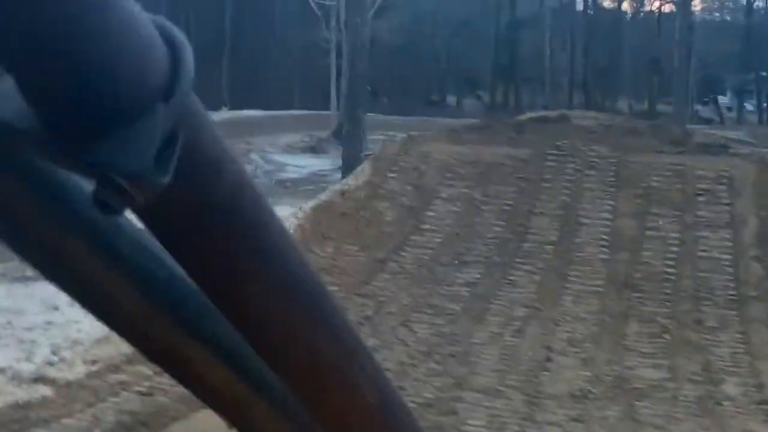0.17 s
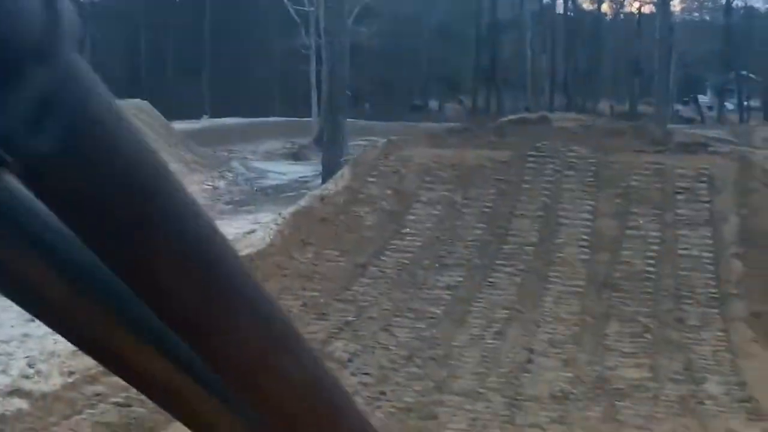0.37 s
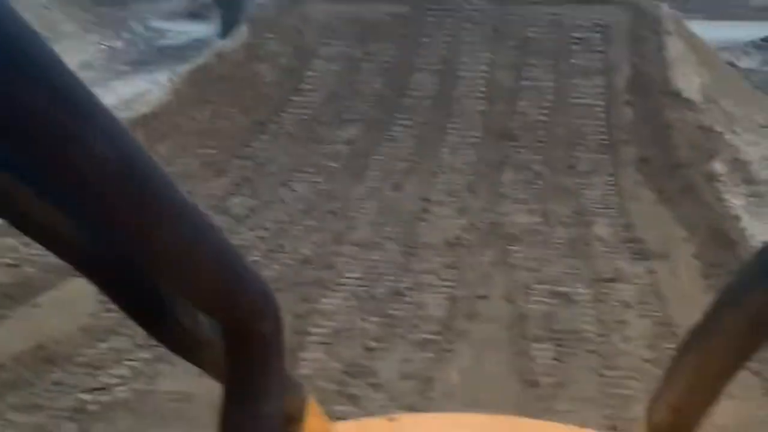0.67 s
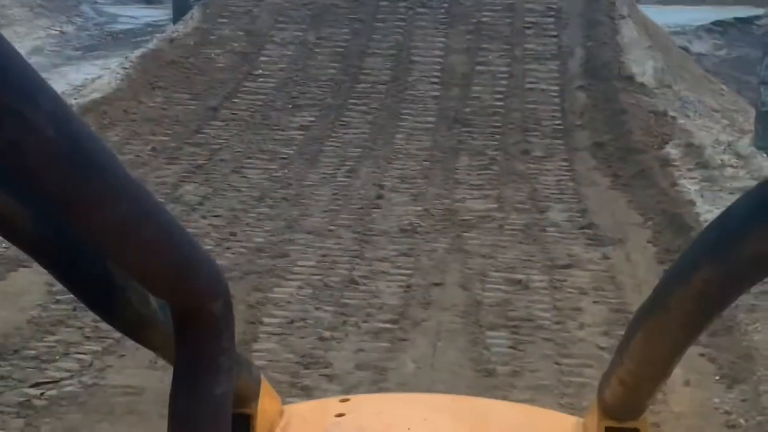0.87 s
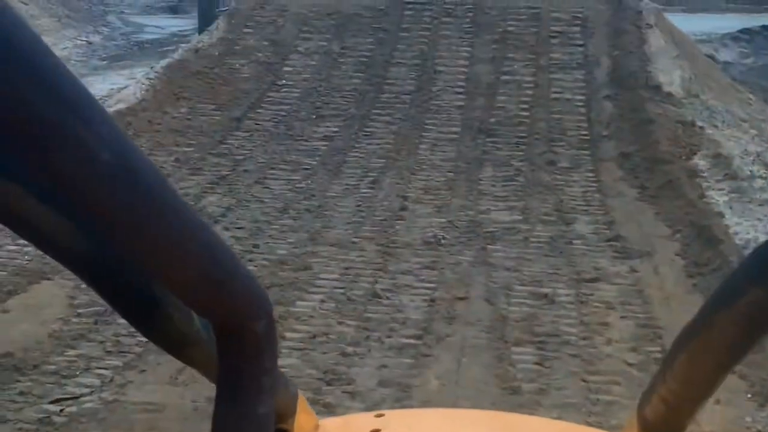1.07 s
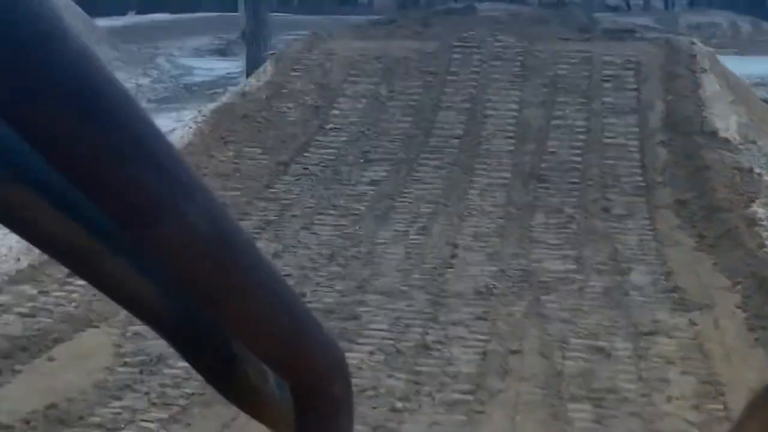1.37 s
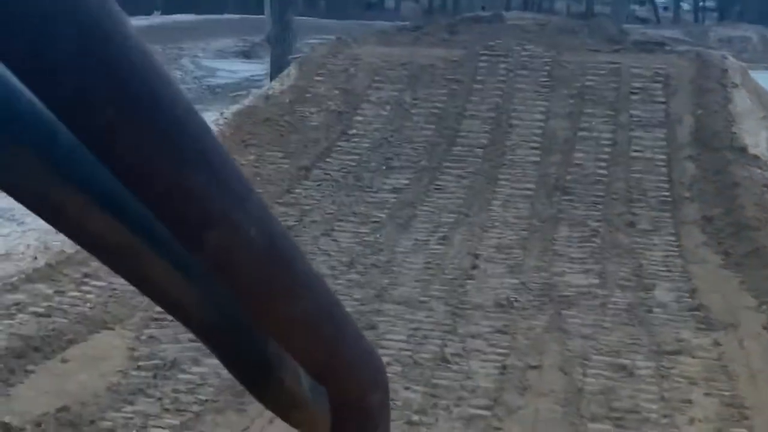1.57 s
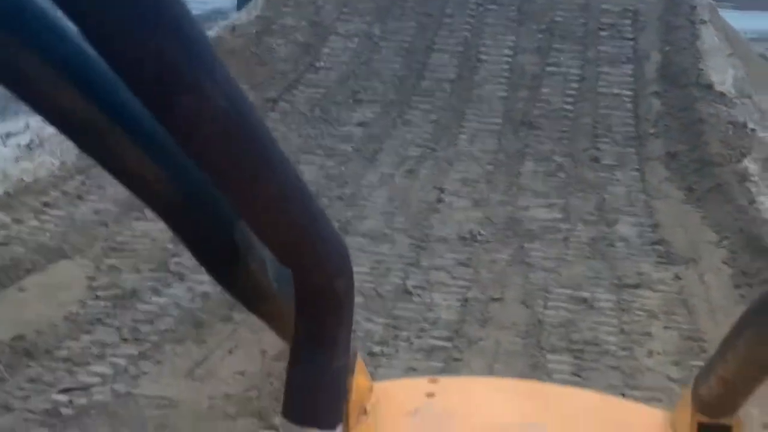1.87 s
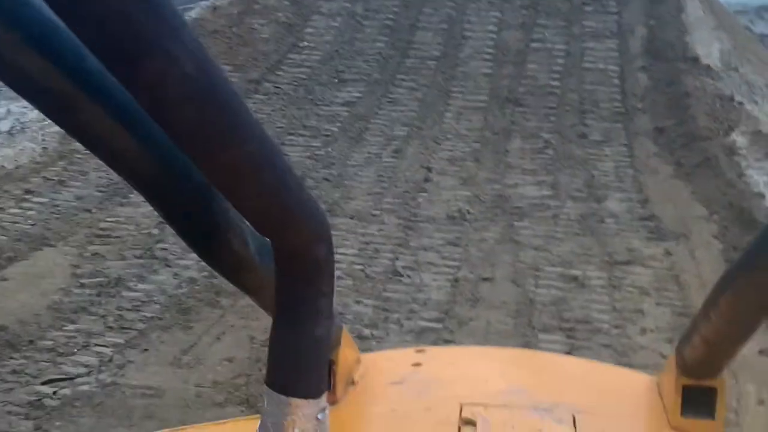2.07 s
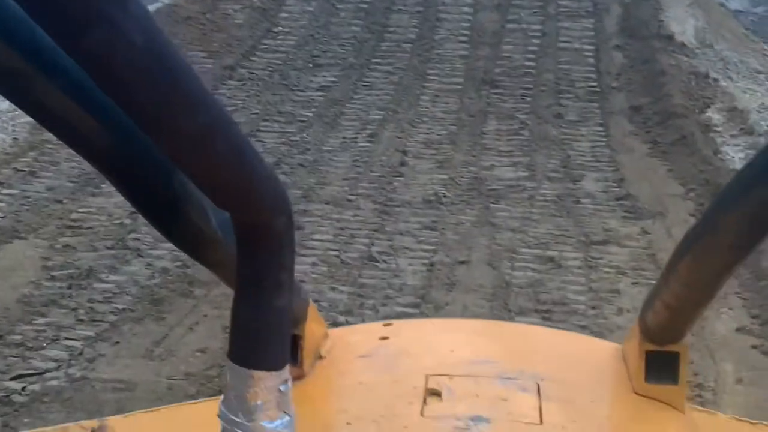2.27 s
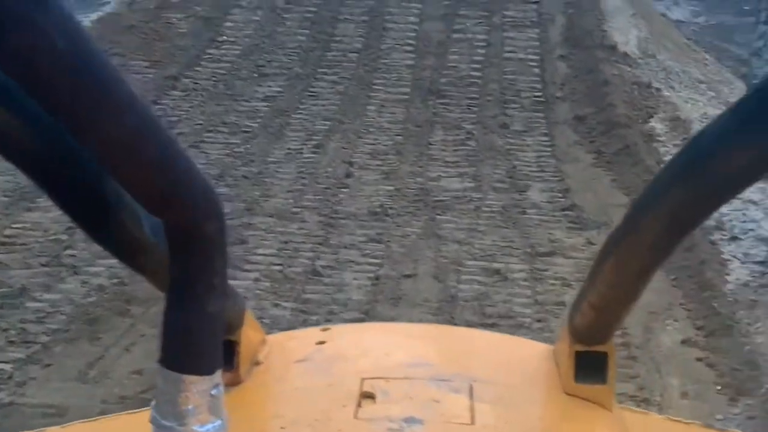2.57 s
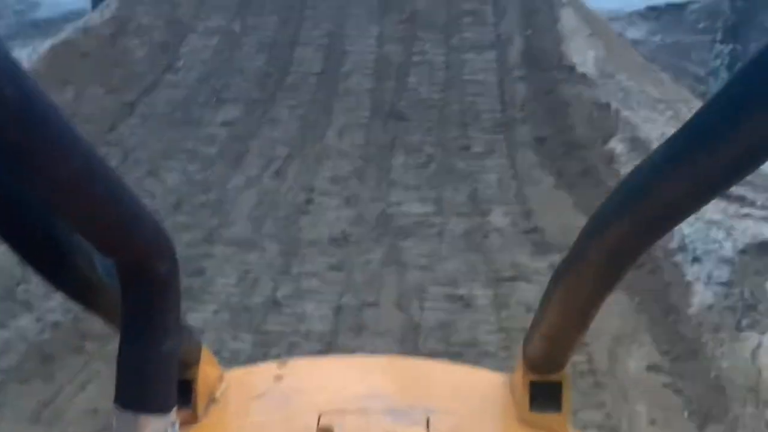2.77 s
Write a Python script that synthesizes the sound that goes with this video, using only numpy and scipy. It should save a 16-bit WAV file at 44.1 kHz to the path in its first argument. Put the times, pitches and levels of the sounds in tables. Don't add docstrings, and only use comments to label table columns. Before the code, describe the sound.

A diesel crawler tractor runs at constant speed outdoors, heard close from the open seat: low humming roar, rapid engine knock, shuddering sheet metal, and irregular track clanks with short metallic rings throughout.

```python
import sys
import numpy as np
from scipy import signal
from scipy.fft import rfft, irfft
from scipy.io import wavfile
from scipy.ndimage import uniform_filter1d

SR = 44100
rng = np.random.default_rng(int(sys.argv[2]) if len(sys.argv) > 2 else 0)


def gain_from_decibels(decibels):
    exponent = np.asarray(decibels, float) / 20
    return 10 ** exponent


def wav_out(sig):
    wavfile.write(sys.argv[1], SR, np.round(np.clip(np.atleast_2d(sig).T, -1, 1) * 32767).astype(np.int16))


N = 128772

PULSE_LEAD_RAD = 0.56
# frequency in Hz, level in dB.
STEEL_COLOUR = [(500, -10), (1500, 9), (3000, 1.5), (6000, 0), (10000, -6), (15000, -10)]


def read(points, hz):
    f, value = np.transpose(points)
    return np.interp(np.log(hz + 1), np.log(f + 1), value)


def evened(x):
    return x / np.sqrt(np.mean(x ** 2) + 1e-20)


def colour(x, points):
    hz = np.fft.rfftfreq(N, 1 / SR)
    return irfft(rfft(x) * gain_from_decibels(read(points, hz)), N)


def slow(top_hz, count):
    t = np.arange(0, N + 128, 128) / SR
    f = np.geomspace(0.3, top_hz, 16)[:, None]
    rows = []
    for _ in range(count):
        sines = np.sin(2 * np.pi * (f * t + rng.random((16, 1))))
        curve = evened((sines / f ** 0.18).sum(0))
        rows.append(np.interp(np.arange(N) / SR, t, curve))
    return np.array(rows)


def patchy(size, bins, frames, depth_db):
    a, b, c, d, patches = rng.standard_normal((4 * N // size + 5, size // 2 + 1, 5)).T
    patches = uniform_filter1d(patches, bins, axis=0)
    patches = evened(uniform_filter1d(patches, frames, axis=1))
    z = np.array([a + 1j * b, c + 1j * d]) * gain_from_decibels(depth_db * patches)
    noise = signal.istft(z, nperseg=size, noverlap=size - size // 4)[1]
    return evened(noise[:, :N])


def cycles():
    # time in seconds, crank cycles in Hz.
    speed = [(0, 12.46), (.3, 12.5), (.5, 12.41), (.65, 12.34), (.9, 12.385), (1.15, 12.36), (1.55, 12.405),
             (1.95, 12.44), (2.2, 12.385), (2.45, 12.425), (2.92, 12.45)]
    return np.cumsum(np.interp(np.arange(N) / SR, *np.transpose(speed))) / SR


def exhaust():
    orders = [4, 5.5, 7, 8, 12, 13.33, 16, 17, 26, 29, 32, 51, 56, 72, 80, 84]
    # level in dB, wobble in dB.
    strengths = [(-30.5, .15), (-50, 3), (-44, 2.5), (-23.5, .3), (-41, 3), (-38, 1.5), (-42, 3), (-45, 3),
                 (-48, 3), (-48, 3), (-46, 2), (-48, 2), (-46, 2), (-50, 2), (-50, 2), (-54, 2)]
    wobble_hz, drift_rad = 5, 0.29
    db, wobble_db = np.transpose(strengths)[:, :, None]
    sway = slow(wobble_hz, count=len(orders))
    drift = slow(wobble_hz, count=len(orders))
    order = np.array(orders)[:, None]
    lead = PULSE_LEAD_RAD * (order / orders[0]) ** 2
    phase = 2 * np.pi * order * cycles() + lead + drift_rad * wobble_db / 2 * drift
    waves = gain_from_decibels(db + wobble_db * sway) * np.cos(phase)
    return np.sqrt(2) * waves.sum(0)


def roar():
    # frequency in Hz, density in dB per Hz.
    roar_colour = [(25, -35), (60, 2), (170, 3.5), (420, -2.5), (1000, -5.5), (2200, -13.5), (4500, -23.5),
                   (9000, -35)]
    # frequency in Hz, width in Hz, level in dB.
    sheets = [(393.3, 15, -46.5), (586, 220, -42), (958, 12, -51), (1351, 12, -53.5), (1720, 54, -58),
              (200.4, 59, -48.5)]
    roar_db, top_db_per_khz = -30.5, -0.24
    hz = np.fft.rfftfreq(N, 1 / SR)
    spectrum = rfft(patchy(size=1024, bins=6, frames=8, depth_db=1.5))
    shape_db = read(roar_colour, hz) + top_db_per_khz * np.maximum(hz - 9000, 0) / 1000
    body = evened(irfft(spectrum * gain_from_decibels(shape_db), N))
    resonances = 0
    for f, width_hz, db in sheets:
        resonance = 1 / (1 + (2 * (hz - f) / width_hz) ** 2)
        resonances = resonances + gain_from_decibels(db) * evened(irfft(spectrum * resonance, N))
    throb = gain_from_decibels(1.5 * np.cos(2 * np.pi * (cycles() - 0.15)))
    return gain_from_decibels(roar_db) * body + throb * resonances


def rap():
    ring_hz, width_s, slip_s = 760, 0.0011, 0.0005
    rap_db, spread_db, weak_db = -29.5, 2.5, -6
    usual_cycle_hz = 12.41
    firing = 4 * cycles() + PULSE_LEAD_RAD / (2 * np.pi) + 0.5
    k = firing.astype(int)
    size, slip = rng.standard_normal((k[-1] + 1, 2))[k].T
    t = (firing % 1 - 0.5) / (4 * usual_cycle_hz) - slip_s * slip
    db = rap_db + spread_db * size + weak_db * (k % 4 == 1)
    return gain_from_decibels(db) * np.exp(-0.5 * (t / width_s) ** 2) * np.cos(2 * np.pi * ring_hz * t)


def knock():
    # frequency in Hz, level in dB.
    knock_colour = [(300, -22), (800, 1), (2000, 5.5), (4500, -32), (9000, -10), (15000, -18)]
    cylinder_db = np.array([1.5, -1.5, -4.5, 0.085])
    knock_db, decay_firings = -44.5, 0.93
    firing = 4 * cycles()
    k = firing.astype(int)
    chance_db = 2.3 * rng.standard_normal(k[-1] + 1)[k]
    puff = gain_from_decibels(cylinder_db[k % 4] + chance_db) * np.exp(-(firing % 1) / decay_firings)
    noise = colour(rng.standard_normal((2, N)), knock_colour)
    return gain_from_decibels(knock_db) * evened(evened(puff) * noise)


def shudder(table, spread_s, trim_db):
    reach = SR // 16
    t, out = np.arange(-reach, reach) / SR, np.zeros(N + SR)
    for (s, hz, db), start in zip(table, rng.random(len(table))):
        at = round(s * SR)
        swell = gain_from_decibels(db + trim_db) * np.exp(-0.5 * (t / spread_s) ** 2)
        out[at:at + len(t)] += swell * np.sin(2 * np.pi * (hz * t + start))
    return out[reach + 1:][:N]


def thump():
    # time in seconds, frequency in Hz, level in dB.
    hood = [(0.012, 382, -30), (0.058, 355, -31), (0.186, 398, -27), (0.255, 387, -27), (0.302, 398, -28),
            (0.334, 387, -31), (0.403, 392, -28), (0.746, 382, -26), (0.833, 409, -31), (0.981, 387, -28),
            (1.057, 387, -25), (1.138, 387, -25), (1.248, 387, -26), (1.312, 387, -27), (1.425, 382, -29),
            (1.463, 387, -25), (1.518, 403, -31), (1.576, 387, -29), (1.625, 387, -29), (1.701, 414, -29),
            (1.805, 387, -27), (1.86, 392, -29), (1.945, 387, -27), (2.026, 387, -31), (2.087, 366, -29),
            (2.122, 387, -30), (2.186, 392, -29), (2.276, 387, -31), (2.456, 366, -31), (2.514, 392, -28),
            (2.589, 398, -30), (2.647, 355, -30), (2.694, 387, -28), (2.731, 382, -27), (2.842, 382, -31),
            (2.911, 382, -29)]
    # time in seconds, frequency in Hz, level in dB.
    cab = [(0.02, 753, -34), (0.134, 656, -31), (0.134, 990, -34), (0.145, 457, -30), (0.194, 538, -31),
           (0.223, 990, -34), (0.267, 694, -33), (0.308, 1243, -34), (0.412, 565, -31), (0.441, 1216, -38),
           (0.444, 592, -31), (0.47, 764, -34), (0.499, 231, -27), (0.551, 710, -32), (0.61, 495, -32),
           (0.633, 613, -32), (0.711, 683, -32), (0.746, 1308, -38), (0.868, 220, -28), (0.955, 559, -31),
           (1.019, 317, -30), (1.062, 705, -32), (1.062, 958, -35), (1.08, 1426, -39), (1.097, 484, -31),
           (1.109, 274, -31), (1.12, 764, -34), (1.132, 888, -34), (1.295, 193, -27), (1.37, 317, -32),
           (1.384, 753, -34), (1.416, 1324, -38), (1.445, 1001, -34), (1.448, 1195, -38),
           (1.527, 1410, -38), (1.55, 220, -28), (1.768, 215, -27), (1.771, 1415, -39), (1.852, 699, -30),
           (1.852, 1410, -38), (1.858, 780, -34), (1.878, 489, -32), (2.093, 193, -27), (2.273, 220, -27),
           (2.328, 317, -30), (2.485, 301, -29), (2.485, 1157, -37), (2.511, 581, -31), (2.569, 1372, -38),
           (2.586, 576, -31), (2.595, 188, -27), (2.606, 1211, -38), (2.778, 942, -33), (2.818, 952, -35),
           (2.833, 581, -32), (2.905, 958, -33)]
    return shudder(hood, spread_s=0.013, trim_db=0) + shudder(cab, spread_s=0.014, trim_db=-1)


def clanks():
    # (lowers the dull part,
    # raises the bright; they part near 4 kHz).
    landings = [(0.0558, -34.5, -1), (0.0997, -40.5, 4), (0.1496, -37, -6.5), (0.2004, -44.5, 4),
                (0.2224, -52, 4), (0.295, -39, -3), (0.3854, -47.5, 5.5), (0.5374, -30, -4),
                (0.628, -49, -2), (0.726, -44, 4.5), (0.7886, -48, -6), (0.9513, -40, -4), (1.0056, -49, 6),
                (1.038, -47, 7), (1.072, -33, -2.5), (1.113, -52, -5), (1.1907, -41, 2),
                (1.2607, -33.5, -2), (1.4106, -36, -4), (1.515, -37, -2), (1.5419, -37, -2.5),
                (1.5948, -48, 1), (1.6666, -38, 0.5), (1.7574, -47, 3), (1.8334, -41, -4), (1.8974, -39, 1),
                (1.9939, -54, 6), (2.0742, -49, 1), (2.1585, -44, 1), (2.2288, -34.5, 0.5),
                (2.423, -35, -3), (2.4814, -40, 1.5), (2.56, -41, 2), (2.7033, -45, 1), (2.745, -36, -5),
                (2.804, -56, 0), (2.8794, -30, -2.5)]
    # frequency in Hz, level in dB, 60 dB decay time in seconds.
    link_modes = [(2550, 0, .1), (3700, -2, .1), (4490, -1, .1), (4850, -1, .1), (5560, -1, .1),
                  (6550, -4, .08), (7800, 0, .13)]
    # time in seconds, frequency in Hz, level in dB, 60 dB decay in seconds.
    loose = [
        (.155, 3700, -44, .2),
        (1.54, 3700, -46, .2),
        (2.428, 2550, -41, .15),
        (2.432, 3300, -43, .15),
        (2.425, 7800, -50, .15),
        (2.674, 3270, -36, .1),
        (2.879, 7800, -40, .07),
        (2.88, 2750, -39, .2),
    ]
    crash_db, crash_t60, rise_s = -6.5, 0.33, 0.001
    snap, snap_t60 = 1.3, 0.05
    ring_db, ring_spread_db = -13, 3
    t = np.arange(SR // 4) / SR
    crash, ring = np.zeros((2, N + SR)), np.zeros((2, N + SR))
    shape = gain_from_decibels(-60 * t / crash_t60) + snap * gain_from_decibels(-60 * t / snap_t60)
    shape = shape * np.minimum(t / rise_s, 1)
    picks = rng.standard_normal((len(landings), len(link_modes), 3))
    for (s, db, tilt_db), pick in zip(landings, picks):
        at = round(s * SR)
        dull_and_bright_db = tilt_db * np.array([[-1], [1]])
        crash[:, at:at + len(t)] += gain_from_decibels(db + crash_db + dull_and_bright_db) * shape
        for (hz, mode_db, t60), (a, b, c) in zip(link_modes, pick):
            level = gain_from_decibels(db + ring_db + mode_db + ring_spread_db * a - 60 * t / t60)
            pitch = hz * (1 + 0.00386 * b) * np.array([[1], [1 + 0.0017 * c]])
            ring[:, at:at + len(t)] += level * np.sin(2 * np.pi * pitch * t)
    for s, hz, db, t60 in loose:
        at = round(s * SR)
        level = gain_from_decibels(db - 60 * t / t60) * np.minimum(t / 0.001, 1)
        ring[:, at:at + len(t)] += level * np.sin(2 * np.pi * hz * t)
    noise = evened(colour(patchy(size=256, bins=5, frames=16, depth_db=2.5), STEEL_COLOUR))
    dull = colour(noise, [(3500, 0), (7000, -30)])
    bright = noise - dull
    grit = gain_from_decibels(1.92 * evened(uniform_filter1d(rng.standard_normal(N), size=90)))
    return grit * (crash[0, :N] * dull + crash[1, :N] * bright) + ring[:, :N]


def tinkle():
    # frequency in Hz, level in dB.
    pitch_levels = [(900, -45), (1500, -44), (3000, -50), (5000, -55), (8000, -58), (13000, -62)]
    per_s, t60, spread_db, rise_s = 180, 0.12, 5, 0.0026
    low_hz, high_hz = pitch_levels[0][0], pitch_levels[-1][0]
    t, out = np.arange(SR // 16) / SR, np.zeros(N + SR)
    for when, pitch, size in rng.random((round(per_s * N / SR), 3)):
        hz = low_hz * (high_hz / low_hz) ** pitch
        at = int(when * N)
        db = read(pitch_levels, hz) + spread_db * (2 * size - 1) - 60 * t / t60
        out[at:at + len(t)] += gain_from_decibels(db) * np.minimum(t / rise_s, 1) * np.sin(2 * np.pi * hz * t)
    return out[:N]


def rattle():
    per_s, rattle_db, spread_db, t60 = 170, -50, -3.5, 0.054
    size = gain_from_decibels(spread_db * np.minimum(rng.exponential(1, N), 3))
    ticks = size * (rng.random(N) < per_s / SR)
    shape = signal.lfilter([1], [1, -gain_from_decibels(-60 / (t60 * SR))], ticks)
    noise = colour(patchy(size=256, bins=4, frames=8, depth_db=4), STEEL_COLOUR)
    return gain_from_decibels(rattle_db) * evened(shape * noise)


def ahead():
    # time in seconds, level in dB.
    hiss_levels = [(0, -75), (.15, -80), (.42, -74), (.55, -62), (.7, -64), (.8, -76), (1.15, -66),
                   (1.43, -78), (1.58, -64), (1.87, -64), (2.05, -77), (2.42, -63), (2.62, -76),
                   (2.85, -64)]
    centre_hz, width_hz = 4950, 500
    hz = np.fft.rfftfreq(N, 1 / SR)
    spectrum = rfft(rng.standard_normal(N)) * np.exp(-((hz - centre_hz) / width_hz) ** 2)
    level_db = np.interp(np.arange(N) / SR, *np.transpose(hiss_levels))
    return gain_from_decibels(level_db) * evened(irfft(spectrum, N))


def scene():
    # frequency in Hz, likeness from 0 to 1.
    likeness = [(140, 1), (250, .96), (500, 0.83), (1500, .7), (3000, 0.3), (4600, 0.9), (9700, .97),
                (14500, .86)]
    # frequency in Hz, phase in radians.
    port_phase = [(0, 0), (800, .7), (2100, -.6), (4200, -2.35), (5250, -3.55), (6300, -6.08), (8400, -7.8),
                  (15000, -16.1)]
    # frequency in Hz, left over right in dB.
    balance = [(60, 1.3), (180, 1.2), (350, 1.8), (700, .4), (1500, -1.1), (3000, -.9), (6000, -.3),
               (13800, 0)]
    engine = exhaust() + roar() + rap() + knock()
    metal = thump() + clanks() + tinkle() + rattle()
    near, other = rfft(engine + metal)
    hz = np.fft.rfftfreq(N, 1 / SR)
    same = np.clip(read(likeness, hz), 0, 1)
    lean = gain_from_decibels(read(balance, hz) / 2)
    turn = np.exp(1j * np.interp(hz, *np.transpose(port_phase)))
    right = (same * near + 1j * np.sqrt(1 - same ** 2) * other) * turn
    top_loss = gain_from_decibels(-7.0 * np.maximum(hz - 14200, 0) / 1000)
    return irfft(np.array([near * lean, right / lean]) * top_loss, N) + ahead()


def top_cut(x):
    return signal.sosfilt(signal.butter(12, 15750, fs=SR, output="sos"), x)


def record(dry):
    limit, edge_hz = 0.47, 15750
    soft = limit * np.tanh(dry / limit)
    low_pass = signal.firwin(511, edge_hz, window=("kaiser", 9), fs=SR)
    mix = signal.oaconvolve(soft, low_pass[None], "same")
    return top_cut(mix)


dry = scene()
out = record(dry)
wav_out(out)
```